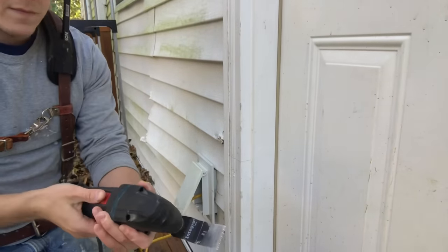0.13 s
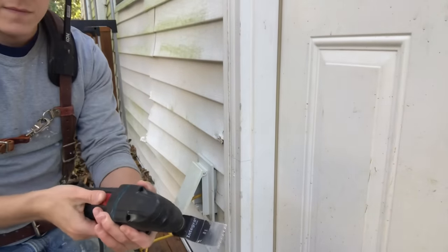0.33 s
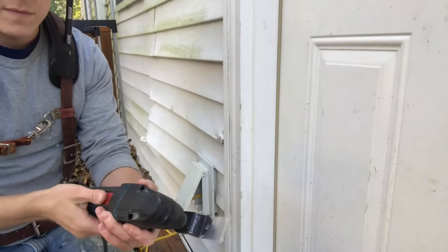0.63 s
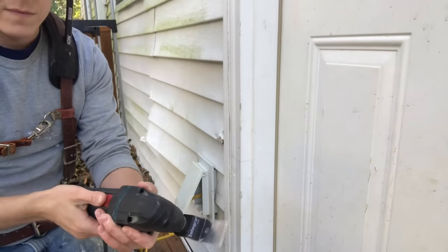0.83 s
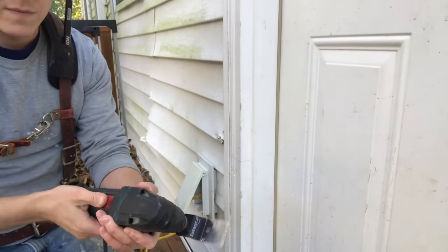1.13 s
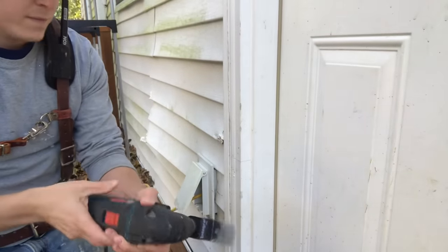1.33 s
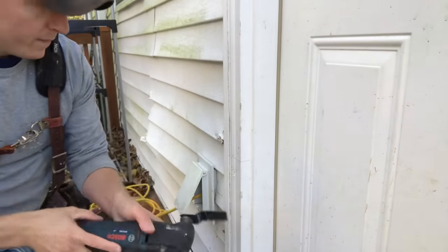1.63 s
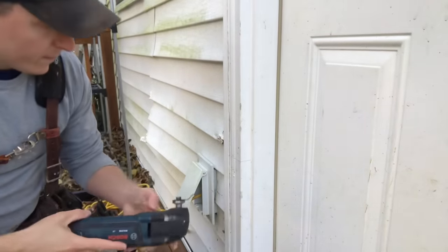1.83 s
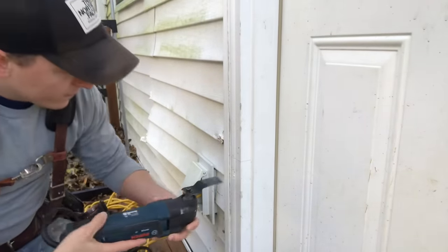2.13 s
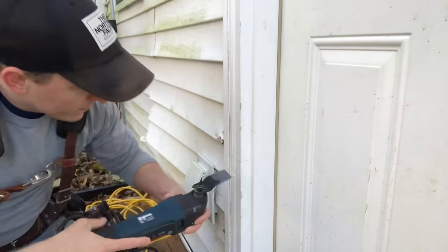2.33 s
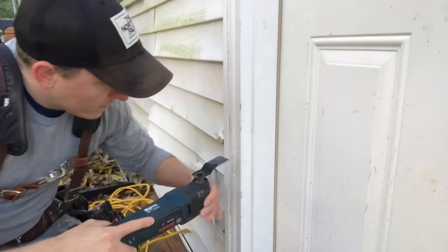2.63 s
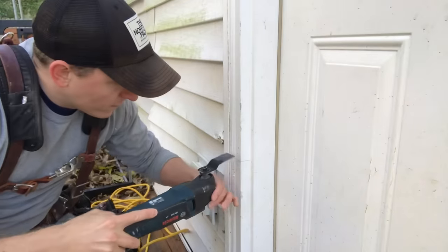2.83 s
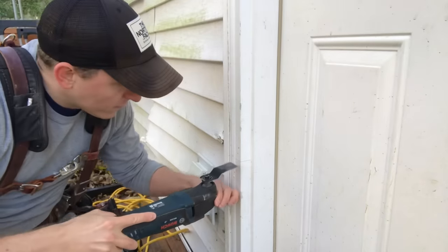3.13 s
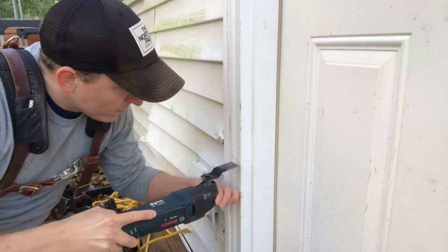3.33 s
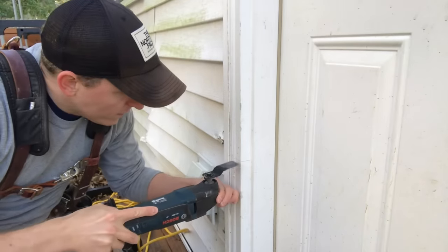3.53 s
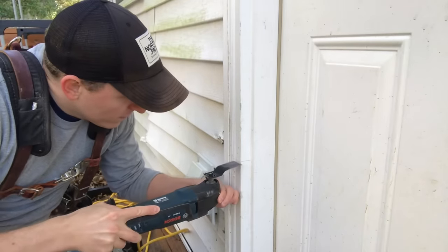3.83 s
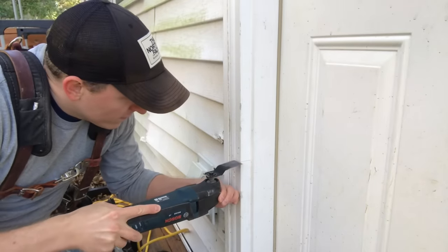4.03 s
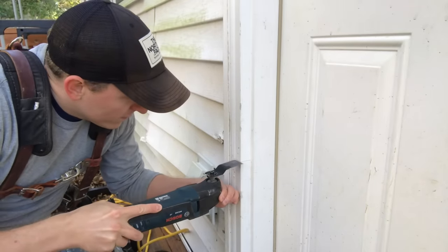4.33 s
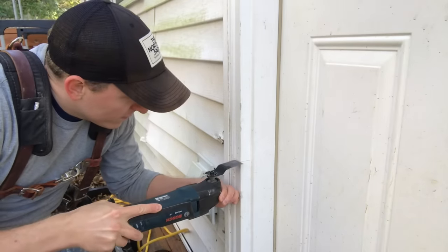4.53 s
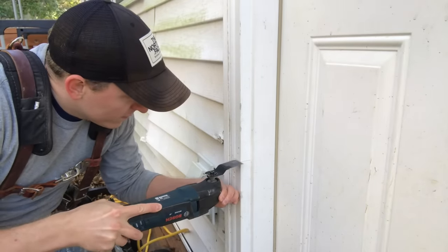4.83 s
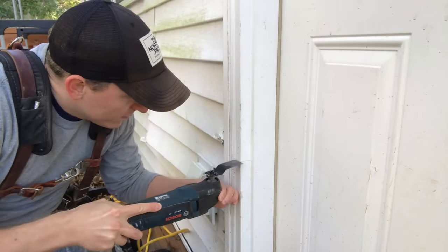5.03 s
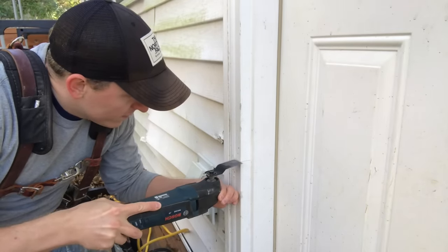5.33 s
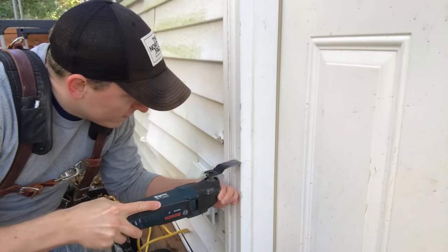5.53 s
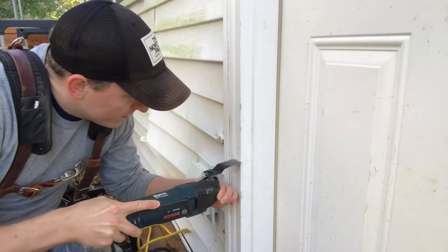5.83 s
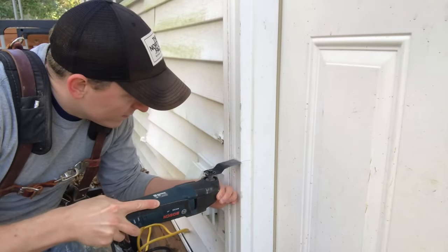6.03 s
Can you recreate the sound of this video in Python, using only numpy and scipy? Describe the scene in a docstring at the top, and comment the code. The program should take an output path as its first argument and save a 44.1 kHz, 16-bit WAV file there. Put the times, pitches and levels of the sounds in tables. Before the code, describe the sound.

Close by, outside a house door, soft air precedes a hard click with a tiny bounce. After a short pause an electric multi-tool rattles, surges to full speed and buzzes constantly, a dense, hard-edged mid-pitched drone over airy fan roar and thin high whine. The timbre wavers while the tool is repositioned, becomes firmer against the trim, then flickers with short slips and faint jolts as it cuts wood. It never switches off.

```python
"""A mains-powered oscillating tool buzzes: a tone made of stroke partials over brush and fan roar.
It is clicked on, chatters, runs up to speed, is turned and set against wooden trim, then bites the wood.
The blade slips out now and then, which dulls the tone. Each stroke knocks the housing, and the knocks
follow a motor pull that pulses at twice the mains frequency. Filtered noise makes quiet air and wind."""
import sys
import numpy as np
from scipy import signal
from scipy.fft import rfft, irfft, next_fast_len
from scipy.io import wavfile
from scipy.ndimage import uniform_filter1d, map_coordinates

SR = 44100
rng = np.random.default_rng(int(sys.argv[2]) if len(sys.argv) > 2 else 0)


def file_out(sig):
    """Save sig as 16-bit WAV at sys.argv[1]."""
    # one column per channel
    cols = np.atleast_2d(sig).T
    # limit, then scale
    lim = np.clip(cols, -1, 1)
    pcm = np.round(lim * 32767).astype(np.int16)
    wavfile.write(sys.argv[1], SR, pcm)


N = 272097
T = np.arange(N) / SR
MAINS_PULSE_HZ = 120  # twice the mains frequency
FULL_SPEED_HZ = 284  # strokes per second, the reference for "full speed"


def amp(db):
    """Gain for a level in dB."""
    return 10 ** (np.asarray(db) / 20)


def evened(x):
    """Scales to rms 1."""
    return x / np.sqrt(np.mean(x ** 2) + 1e-20)


def curves(rows, t=T):
    """Reads each column of a table along the times t, with straight lines between rows."""
    times, *columns = np.transpose(rows)
    return [np.interp(t, times, column) for column in columns]


def coloured(x, points):
    """Filters x by a spectrum drawn through (frequency [Hz], level [dB]) and scales it to rms 1."""
    size = next_fast_len(len(x))
    hz, db = np.transpose(points)
    log_hz = np.log(np.fft.rfftfreq(size, 1 / SR) + 1)
    gain = amp(np.interp(log_hz, np.log(hz + 1), db))
    return evened(irfft(rfft(x, size) * gain, size)[:len(x)])


def ring(x, hz, width_hz):
    """One resonance, with a gain of about 1 at its peak."""
    r = np.exp(-np.pi * width_hz / SR)
    return 2 * signal.lfilter([1 - r], [1, -r * np.exp(2j * np.pi * hz / SR)], x).real


def treble(x, hz):
    """Takes out what lies below hz."""
    return signal.sosfilt(signal.butter(3, hz, "high", fs=SR, output="sos"), x)


def add(mix, s, sound):
    """Mixes a sound in at time s."""
    part = mix[round(s * SR):][:len(sound)]
    part += sound[:len(part)]


# Colour of the outdoor air: (frequency [Hz], relative level [dB per Hz])
AIR_COLOUR = [(100, -35), (170, -17.5), (233, -6.5), (296, -12), (343, -12.5), (679, -13), (831, -17),
              (1770, -21.5), (11500, -32), (13500, -44), (16000, -50)]
AIR_DB = -86
# Strength of the wind: (time [s], level [dB])
WIND_LEVEL = [(0.0, -79), (0.25, -87), (0.6, -83), (1.7, -88), (2.1, -79), (2.31, -91), (4.7, -89.5),
              (5.8, -83)]
# Colour of the wind: (frequency [Hz], relative level [dB per Hz])
WIND_COLOUR = [(15, -40), (30, -9), (60, 1), (100, -6), (170, -11), (300, -35), (600, -72)]


def air():
    """Quiet outdoor air and a lumpy low wind, both filtered noise."""
    lumps = amp(1.8 * evened(uniform_filter1d(rng.standard_normal(N), 3000)))
    wind_db, = curves(WIND_LEVEL)
    still = amp(AIR_DB) * coloured(rng.standard_normal(N), AIR_COLOUR)
    wind = amp(wind_db) * lumps * coloured(rng.standard_normal(N), WIND_COLOUR)
    return still + wind


# The blade slips out of the wood:
# (time [s], length [s], loss of stroke tone [dB], level of the jolt on biting again [dB])
BLADE_SLIPS = [(4.852, 0.021, 1, -76), (5.093, 0.022, 2, -76), (5.647, 0.069, 4, -67.5),
               (5.954, .035, 6, -76), (6.036, 0.055, 4, -75)]


def slipping(t):
    """How far the blade is out of the wood (0 to 1), and the loss of stroke tone in dB."""
    outs = []
    for s, length, _, _ in BLADE_SLIPS:
        leaves = np.tanh((t - s) / 0.0034)
        returns = np.tanh((t - s - length) / .003)
        outs.append(.5 * (leaves - returns))
    return sum(outs), sum(out * row[2] for out, row in zip(outs, BLADE_SLIPS))


# Switch: a touch, the snap and its bounce, each heard 2.7 ms after: (time [s], relative level [dB])
SWITCH_CLICKS = [(0.1845, -73), (0.3229, -35), (0.3357, -56)]
# Ringing parts of the switch: (frequency [Hz], relative level [dB], time to fade by 60 dB [s])
SWITCH_RINGS = [(1680, -10, 0.025), (2490, -14, 0.055), (2850, -2, 0.017), (3880, -3, 0.015),
                (5701, -22, 0.035), (6240, -20, 0.018), (8100, -6, 0.018), (8969, -26, 0.034),
                (11930, -32, 0.031)]
# Low bumps: (time [s], level [dB], frequency [Hz], length [s])
LOW_BUMPS = [(0.81, -68, 40, 0.047), (1.241, -70, 59.6, 0.043), (1.914, -59, 68, 0.13),
             (2.06, -69, 85, 0.16)]


def knocks():
    """Ringing switch clicks, low sine bumps, and noisy jolts as the blade catches the wood."""
    out, t = np.zeros(N), T[:4000]
    for s, db in SWITCH_CLICKS:
        rings = sum(amp(d - 60 * t / t60) * np.sin(2 * np.pi * hz * t + rng.random() * 6)
                    for hz, d, t60 in SWITCH_RINGS)
        snap = ring(ring(rng.standard_normal(len(t)), 3400, 5600), 3000, 5000)
        snap_fade = 0.32 * amp(-60 * t / 0.0088) + 0.045 * amp(-60 * t / 0.095)
        click = .5 * rings / abs(rings).max() + snap * snap_fade
        onset = np.clip(t / 0.00067, 0, 1)
        add(out, s + 0.0027, amp(db) * treble(click * onset, 730))
    for s, db, hz, length in LOW_BUMPS:
        u = T[:round(length * SR)]
        add(out, s, amp(db) * np.sin(2 * np.pi * hz * u) * np.sin(np.pi * u / length) ** 2)
    for s, length, _, db in BLADE_SLIPS:
        jolt = ring(ring(rng.standard_normal(len(t)), 560, 704), 560, 700) * amp(-60 * t / 0.028)
        add(out, s + length, amp(db) * evened(treble(jolt, 150)))
    return out


# Strength of the slow start, before the rattle and rings are mixed: (time [s], level [dB])
CHATTER_LEVEL = [(0.625, -68), (0.633, -65), (0.655, -61), (0.815, -52.5), (0.845, -49.5)]
# Colour of the rattle: (frequency [Hz], relative level [dB per Hz])
RATTLE_COLOUR = [(180, -65), (300, -43), (601, -16.5), (1150, -11), (1540, -4), (1910, -13), (2110, -9),
                 (4440, -18), (4990, -16), (5790, -12), (15600, -52)]
# Resonances of the housing: (frequency [Hz], width [Hz], relative level [dB])
HOUSING_RINGS = [(610, 50, -11), (1526, 29, 3), (2490, 350, -12), (2880, 40, -7), (3900, 45, -14),
                 (4300, 120, -11)]


def chatter():
    """Before the motor gets going, each mains pulse rattles the housing; the treble swells as it stirs."""
    t = T[:SR]
    pulse = MAINS_PULSE_HZ * t + 0.077
    force = amp(1.8 * rng.standard_normal(MAINS_PULSE_HZ + 2))[pulse.astype(int)]
    fade = np.exp(-(pulse % 1) / 0.36)
    kicks = (0.33 + force * fade) * rng.standard_normal(SR)
    rings = sum(amp(db) * ring(kicks, hz, width) for hz, width, db in HOUSING_RINGS)
    rattle = coloured(kicks, RATTLE_COLOUR)
    dull = ring(ring(rattle, 1600, 3800), 1600, 3400)
    bright = np.clip((t - .63) / .22, 0, 1) ** 1.7
    db, = curves(CHATTER_LEVEL, t)
    gate = np.clip((t - .625) / .004, 0, 1) * np.clip((.89 - t) / 0.024, 0, 1)
    mixed = bright * rattle + (1 - bright) * dull
    return gate * amp(db) * (0.72 * mixed + 0.63 * evened(rings))


# Shape of the motor's pulsing pull: (multiple of the mains pulse, relative level [dB])
PULL_SHAPE = [(1, 0), (2, -4), (3, -3), (4, -6)]


def pull():
    """The pulsing part of the motor's pull: a few harmonics of the mains pulse."""
    return evened(sum(amp(db) * np.cos(2 * np.pi * k * MAINS_PULSE_HZ * T + 0.734 * k * k)
                      for k, db in PULL_SHAPE))


def patchy(x, depth_db):
    """Lets patches of the spectrum swell and fade, as reflections shift around a moving source."""
    _, t, z = signal.stft(x, SR, nperseg=1024, noverlap=768)
    field = rng.standard_normal(z.T.shape).T
    field = evened(uniform_filter1d(uniform_filter1d(field, 12, 0), 24, 1))
    gain = amp(np.interp(t, T, depth_db) * field)
    return signal.istft(z * gain, SR, nperseg=1024, noverlap=768)[1][:N]


# How the tool is held; the pose is 0 held up, 1 turned, 2 lined up, 3 resting, 4 biting:
# (time [s], pose, basic wander of the sound [dB], scaled for each partial and for the roar)
TOOL_POSE = [(.8, 0, 4), (1.36, 0, 2.8), (1.6, 1, 3.5), (2.05, 1, 2.2), (2.42, 2, 2.4), (3.05, 2, 1.5),
             (3.14, 3, 0.41), (4.8, 3, 1.8), (4.89, 3.5, 1.7), (6.17, 4, 1.4)]
# Roar with the vents towards the listener: (frequency [Hz], relative level [dB per Hz])
ROAR_FACING = [(88, -88), (150, -65), (279, -28), (339, -33), (563, -22), (768, -9), (846, -12), (932, -10),
               (1400, -14), (1840, -4), (2240, -8), (3300, -5), (15600, -21.5)]
# Roar with the tool turned away: (frequency [Hz], relative level [dB per Hz])
ROAR_AWAY = [(88, -87), (150, -100), (279, -19.5), (454, -23), (563, -18), (753, -18.5), (846, -5),
             (988, -8), (1400, -3), (1990, -5.5), (2110, -5.5), (2510, -2.5), (6140, 0), (7460, -8),
             (15600, -15)]
# Fuzzy whines of brushes and fan: (frequency [Hz], width [Hz], relative level [dB])
FUZZY_WHINES = [(9650, 25, 5), (10230, 20, -25), (11300, 47, 4), (12400, 90, 0), (13400, 97, 2),
                (14780, 200, -3)]
WHINE_DB = -23  # against the hiss
# Colour of the mains buzz: (frequency [Hz], relative level [dB])
BUZZ_COLOUR = [(150, -66), (300, -42), (500, -23.5), (800, -17.5), (1100, -4), (1500, -3.5), (2500, -3),
               (2950, 5), (3400, -3.5), (4500, -2.5), (5900, -4.5), (6600, -5.5), (8000, -15), (15700, -49)]
# Buzz against the hiss, its change per pose, and an offset that softens its fall from resting to biting
BUZZ_DB, BUZZ_PER_POSE_DB, BITE_OFFSET_DB = -0.7, -1.06, 0.5


def roar(turns):
    """Noise that throbs with stroke and mains, and knocks whose strength follows the mains pull."""
    pose, wander_db = curves(TOOL_POSE)
    buzz_db = BUZZ_DB + BUZZ_PER_POSE_DB * pose + BITE_OFFSET_DB * np.clip(pose - 3, 0, 1)
    stroke_throb = 0.049 * np.cos(2 * np.pi * turns) + 0.1 * np.cos(4 * np.pi * turns)
    noise = (1 + stroke_throb + 0.025 * pull()) * rng.standard_normal(N)
    away = np.clip(pose / 2, 0, 1)
    hiss = (1 - away) * coloured(noise, ROAR_FACING) + away * coloured(noise, ROAR_AWAY)
    whine = evened(sum(amp(db) * evened(ring(noise, hz, width)) for hz, width, db in FUZZY_WHINES))
    half = np.pi * (turns % 1) + 1e-6
    comb = np.sin(61 * half) / np.sin(half) - 1  # one knock a stroke
    # Two faces of the housing: dense resonances, fairly even in level and scattered in phase
    faces = rfft(rng.standard_normal((2, 1400)) * amp(-60 * T[:1400] / 0.032), 4096)
    faces = irfft(faces / abs(faces) ** .7)
    pulled_knocks = comb * pull()
    front, side = (coloured(signal.oaconvolve(pulled_knocks, face)[:N], BUZZ_COLOUR) for face in faces)
    buzz = np.cos(1.584 * pose) * front + np.sin(1.62 * pose) * side
    return patchy(hiss + amp(WHINE_DB) * whine + amp(buzz_db) * buzz, 0.56 + 0.67 * wander_db)


# Partials of the stroke as heard in five poses: (multiple of the stroke rate, relative level [dB])
HELD_UP_PARTIALS = [(1, -15), (2, -15), (3, -0.5), (4, -6), (5, -0.5), (6, -2), (7, -4.5), (8, 0),
                    (9, -4.5), (10, -0.5), (11, -4), (12, 2.5), (13, -3.5), (14, -4), (15, -9.5), (16, -12),
                    (17, -6), (18, -3.5), (19, -8), (20, -12.5), (21, -8.5), (22, -5), (23, -17), (24, -18),
                    (25, -12.5), (26, -15.5), (27, -17), (28, -19.5), (29, -15), (30, -17), (31, -25),
                    (32, -18.5), (33, -20.5), (34, -18.5), (35, -19), (36, -26.5)]
TURNED_PARTIALS = [(1, -14.5), (2, -23), (3, -3.5), (4, -14.5), (5, -7), (6, -6.5), (7, -0.5), (8, -4),
                   (9, -0.5), (10, -4.5), (11, -5.5), (12, -1), (13, -2), (14, -3.5), (15, -3.5), (16, -1),
                   (17, -8.5), (18, -8.5), (19, -12), (20, -5), (21, -8), (22, -11.5), (23, -5.5),
                   (24, -16), (25, -9.5), (26, -20), (27, -11.5), (28, -21), (29, -18), (30, -18.5),
                   (31, -19), (32, -18), (33, -20.5), (34, -23), (35, -19.5), (36, -27.5)]
LINED_UP_PARTIALS = [(1, -23.5), (2, -19.5), (3, -10), (4, -14), (5, -7), (6, -0.5), (7, -9.5), (8, -7),
                     (9, -8), (10, -6), (11, -0.5), (12, 0), (13, -8.5), (14, -11), (15, -7), (16, -9.5),
                     (17, -18), (18, -18), (19, -7.5), (20, -16.5), (21, -10), (22, -16), (23, -12.5),
                     (24, -15), (25, -23.5), (26, -17.5), (27, -19.5), (28, -19), (29, -16), (30, -20),
                     (31, -22), (32, -17.5), (33, -22), (34, -24), (35, -24), (36, -30.5)]
RESTING_PARTIALS = [(1, -18), (2, -15.5), (3, -3.5), (4, -14), (5, -3.5), (6, -0.5), (7, -1.5), (8, -6.5),
                    (9, -1.5), (10, -2), (11, 0.5), (12, -0.5), (13, -0.5), (14, -4.5), (15, -5.5),
                    (16, -7), (17, -3), (18, -6), (19, -7.5), (20, -12), (21, 0), (22, -4), (23, -8),
                    (24, -9.5), (25, -14.5), (26, -19), (27, -20.5), (28, -15), (29, -16), (30, -18),
                    (31, -23), (32, -18.5), (33, -23.5), (34, -26), (35, -21), (36, -27)]
BITING_PARTIALS = [(1, -17.5), (2, -10.5), (3, -10.5), (4, -4), (5, -6), (6, -6.5), (7, -2.5), (8, -2.5),
                   (9, -1), (10, 3.5), (11, -0.5), (12, 1), (13, -15.5), (14, -2.5), (15, -8), (16, -7),
                   (17, -6.5), (18, -15), (19, -17.5), (20, -4), (21, -9.5), (22, -11.5), (23, -22),
                   (24, -18), (25, -21.5), (26, -23), (27, -24), (28, -17.5), (29, -23.5), (30, -22),
                   (31, -17), (32, -22.5), (33, -26.5), (34, -26.5), (35, -28), (36, -30)]
# How late each part of the housing answers: (frequency [Hz], delay [strokes])
HOUSING_LAG = [(1000, 0.3517), (2000, 0.301), (2700, 0.047), (3700, 0.016), (4500, -0.124), (5500, 0.286),
               (10000, 0.318)]
# The lowest partial dips: (time [s], half length [s], change [dB] before the tone is levelled)
LOWEST_DIPS = [(2.403, 0.091, -7), (5.57, 0.053, -20), (6.14, 0.079, -17.5)]
SMEAR_RAD, SMEAR_PER_POSE = 1, -0.073  # phase scatter; the knock sharpens as the tool is steadied
DIP_SMEAR_RAD_PER_DB, SLIP_SMEAR_RAD = 0.14, 0.95  # the knock blurs where the hum dips and in a slip
LOW_CUT_DB = 51  # the two lowest partials fade this much per unit of missing speed
SLIP_HUM = 1.5  # in a slip they also drop by this many times the loss of tone


def strokes(hz, even, shaken):
    """Partials of the stroke; the housing colours them by pose, and they wander while the tool moves."""
    poses = np.array([HELD_UP_PARTIALS, TURNED_PARTIALS, LINED_UP_PARTIALS,
                      RESTING_PARTIALS, BITING_PARTIALS])[:, :, 1]
    t = T[::256]  # slow changes are worked out at every 256th sample
    pose, wander_db = curves(TOOL_POSE, t)
    count = poses.shape[1]
    drift = rng.standard_normal((len(t), count))
    drift = evened(uniform_filter1d(uniform_filter1d(drift, 16, 0), 16, 0))
    scatter = rng.standard_normal(count)
    partial_hz = FULL_SPEED_HZ * np.arange(1, count + 1)
    lag = np.cumsum(np.interp(partial_hz, *np.transpose(HOUSING_LAG)))  # adds up to a phase, in turns
    speed = np.minimum(hz[::256] / FULL_SPEED_HZ, 1)
    dips_db = sum(db * np.exp(-((t - s) / half) ** 2) for s, half, db in LOWEST_DIPS)
    out, loss_db = slipping(t)
    smear = SMEAR_RAD + SMEAR_PER_POSE * pose
    smear = smear - DIP_SMEAR_RAD_PER_DB * dips_db + SLIP_SMEAR_RAD * out
    partials = []
    for k in range(count):
        # The three lowest partials come from the even swing of the rotor
        turns = even if k < 3 else shaken
        # Below full speed a higher partial meets lower resonances
        place = (k + 1) * (speed if k > 2 else np.ones(len(t))) - 1
        db = map_coordinates(poses, [pose, place], order=1, mode="nearest")
        db += wander_db * drift[:, k] * min(0.4 + 0.22 * k, 1)
        if k < 2:
            db -= LOW_CUT_DB * (1 - speed) + SLIP_HUM * loss_db
        if k < 1:
            db += dips_db
        db -= 5 * k * (1 - speed)  # loose strokes lose their high partials
        phase = 2 * np.pi * ((k + 1) * turns - lag[k]) + np.interp(T, t, smear * scatter[k])
        partials.append((amp(db), phase))
    # Level the tone so that its strength comes from the tool's own level curve
    total = np.sqrt(uniform_filter1d(sum(gain ** 2 / 2 for gain, _ in partials), 16))
    return sum(np.interp(T, t, gain / total) * np.cos(phase) for gain, phase in partials)


# Strength of the running tool after its fade-in and outside slips:
# (time [s], stroke tone level [dB], brush and fan roar level [dB])
RUN_LEVELS = [(0.8, -50, -54), (0.84, -56, -52.5), (0.852, -48.5, -49.5), (0.992, -39.5, -46),
              (1.2, -38.5, -47.5), (1.55, -40.5, -48.5), (1.81, -40, -50), (2.04, -44, -50),
              (2.17, -41, -49), (2.38, -42.5, -49), (2.52, -40.5, -49.5), (2.94, -42.5, -49.5),
              (4.7, -42, -49.5), (5.6, -42, -49), (5.76, -41, -48), (5.94, -41, -49.5), (6.17, -42, -49.5)]
# The speed still missing dies as exp(-(time since stirring / RUN_UP_S) ** RUN_UP_SHAPE)
STIR_S, RUN_UP_S, RUN_UP_SHAPE = .72, .137, 1.5
# Governed strokes per second, their sag in the wood, slow hunting (rms) and slowing in a slip
IDLE_HZ, LOAD_SAG_HZ, HUNT_HZ, SLIP_SAG_HZ = 284.2, .3, .25, 2.5
SLIP_ROAR_DB = 2  # out of the wood the roar flares


def tool():
    """The running tool: stroke tone and roar; the strokes are shakier until the motor is up to speed."""
    out, loss_db = slipping(T)
    hunting = evened(uniform_filter1d(uniform_filter1d(rng.standard_normal(N), 9000), 9000))
    load = np.clip(curves(TOOL_POSE)[0] - 3, 0, 1)
    governed = IDLE_HZ - LOAD_SAG_HZ * load + HUNT_HZ * hunting - SLIP_SAG_HZ * out
    since_stir = np.maximum(T - STIR_S, 0)
    hz = governed * (1 - np.exp(-(since_stir / RUN_UP_S) ** RUN_UP_SHAPE))
    slack = np.clip(1 - hz / FULL_SPEED_HZ, 0, .3)
    jitter_hz = 0.295 * evened(uniform_filter1d(rng.standard_normal(N), 900))
    turns = np.cumsum(hz + jitter_hz) / SR
    shaken = turns + .09 * slack * evened(ring(rng.standard_normal(N), 60, 120))
    tone_db, roar_db = curves(RUN_LEVELS)
    start = np.clip((T - .8) / 0.051, 0, 1) ** 2
    tone = amp(tone_db - loss_db) * strokes(hz, turns, shaken)
    return start * (tone + amp(roar_db + SLIP_ROAR_DB * out) * roar(turns))


def scene():
    """All the sounds are summed into one signal, the same in both channels."""
    mix = tool() + knocks() + air()
    add(mix, 0, chatter())
    return np.array([mix, mix])


EDGE_HZ = 15740  # upper edge of the sound


def record(dry):
    """The band limit: a steep filter takes out what lies above the edge."""
    low_pass = signal.firwin(1023, EDGE_HZ, window=("kaiser", 9), fs=SR)
    return signal.oaconvolve(dry, low_pass[None], "same")


dry = scene()
out = record(dry)
file_out(out)
```